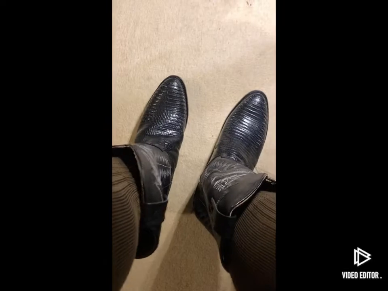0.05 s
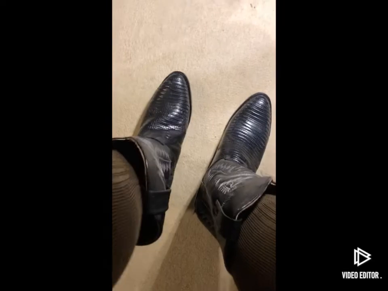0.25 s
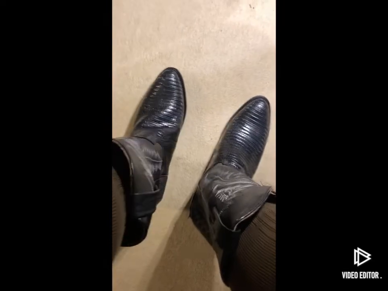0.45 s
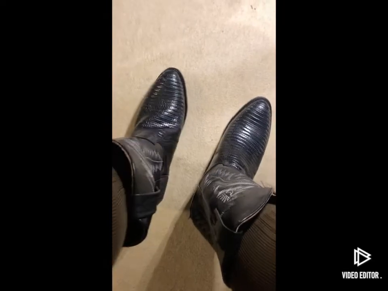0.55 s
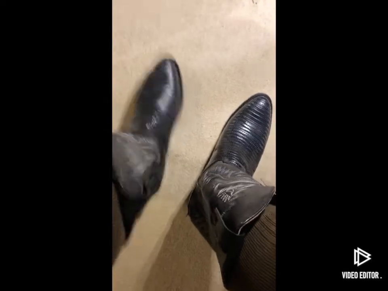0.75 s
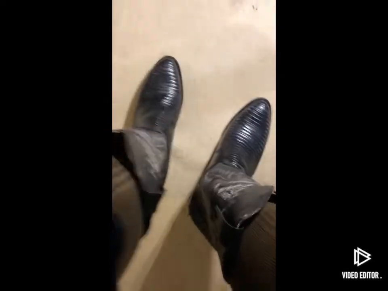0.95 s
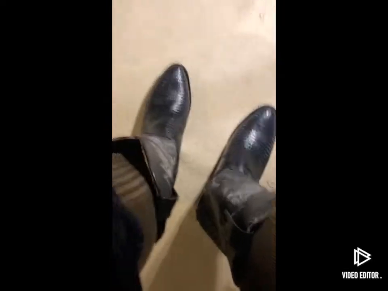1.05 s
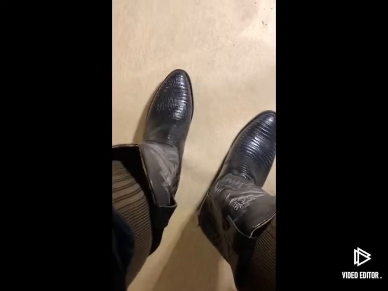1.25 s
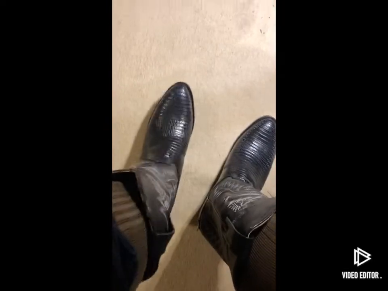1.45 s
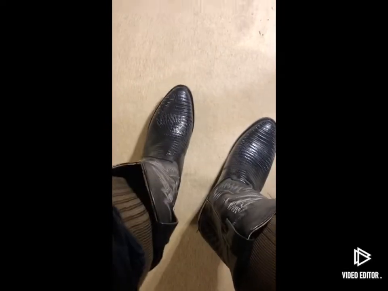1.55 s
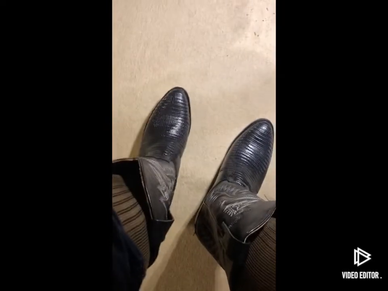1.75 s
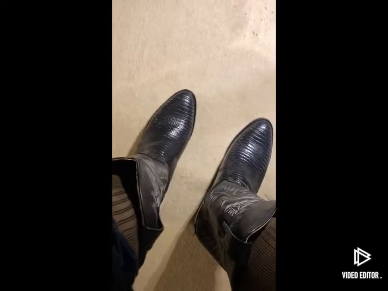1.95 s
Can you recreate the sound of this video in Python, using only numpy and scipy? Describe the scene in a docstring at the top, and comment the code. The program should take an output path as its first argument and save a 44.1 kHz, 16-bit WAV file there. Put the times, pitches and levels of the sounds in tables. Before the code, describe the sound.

Trouser cloth rubs over a leather boot as it creaks and scuffs on the floor.

```python
"""Trouser cloth rubs in strokes over a leather boot as it shifts on the floor of a small room.
Creases in the leather buckle with falling pops and dry crackles, and the hollow shaft rings with
the rubbing and the pops. The sole drags, slips and bumps along the floor; a mains hum runs underneath.
One microphone at knee height, with the short reflections of the room behind the boot."""
import sys
import numpy as np
from scipy import signal
from scipy.fft import rfft, irfft
from scipy.io import wavfile
from scipy.ndimage import uniform_filter1d

SR = 44100
rng = np.random.default_rng(int(sys.argv[2]) if len(sys.argv) > 2 else 0)


def transcribe(signal):
    """Save signal, clipped to [-1, 1], as a 16-bit WAV file at the path in sys.argv[1]."""
    frames = np.atleast_2d(signal).T
    limited = np.clip(frames, -1, 1)
    pcm = np.round(limited * 32767).astype(np.int16)
    wavfile.write(sys.argv[1], SR, pcm)


N = 88200

# hiss of cloth, also the crisp top of a slipping sole: frequency_hz, gain_db
HISS_SPECTRUM = [(3000, -13), (6000, 0), (8000, -2), (10500, -1), (13000, -4), (16000, -4.5)]


def undb(db):
    return 10 ** (np.asarray(db) / 20)


def unit_rms(x):
    return x / np.sqrt(np.mean(x ** 2))


def since(start_s):
    return np.maximum(np.arange(N) / SR - start_s, 0)


def colour(x, spectrum):
    """Filter by a curve through points of frequency_hz, gain_db."""
    hz, db = np.array(spectrum, float).T
    bin_hz = np.maximum(np.arange(N + 1) * SR / (2 * N), 1)
    gain = undb(np.interp(np.log(bin_hz), np.log(hz), db))
    return irfft(rfft(x, 2 * N) * gain)[:N]


def noise(spectrum):
    return unit_rms(colour(rng.standard_normal(N), spectrum))


def wander(per_s):
    """Smooth random drift with a spread near 1."""
    hold = max(int(SR / per_s), 2)
    steps = rng.standard_normal(N)[np.arange(N) // hold]
    return unit_rms(uniform_filter1d(steps, hold))


def friction(spectrum, grains_per_s=14000, spread_db=0.5, catches_per_s=110, catch_db=1.1):
    """Dense tiny releases of uneven size, in bunches as the surfaces catch."""
    hits = rng.random(N) < grains_per_s / SR
    grains = hits * rng.standard_normal(N) * undb(spread_db * np.minimum(rng.exponential(size=N), 4))
    bunching = undb(catch_db * wander(catches_per_s))
    return unit_rms(colour(grains * bunching, spectrum))


def room_tone(hum_hz=118.5, hum_db=-52.5, octave_db=-19.5, waver_db=0.5, air_db=-56):
    """A slightly wavering mains hum over still room air."""
    # room air: frequency_hz, gain_db
    air_spectrum = [(20, -38), (55, -0.5), (140, -4), (250, -5), (500, -15), (1000, -20), (2000, -22),
                    (4500, -23.5), (8000, -29), (16000, -30.5)]
    phase = 2 * np.pi * hum_hz * since(0)
    hum = unit_rms(np.sin(phase) + undb(octave_db) * np.sin(2 * phase))
    return undb(hum_db + waver_db * wander(per_s=9.1)) * hum + undb(air_db) * noise(air_spectrum)


def small_room(x, t60_s=0.43, gap_s=0.0045, reflections_db=-18.5):
    """The direct sound reaches the microphone, then short, dull reflections from floor and walls."""
    # reflections: frequency_hz, gain_db
    tail_spectrum = [(60, -35), (170, -18.5), (300, 3.5), (700, -2), (2000, 1.5), (8000, -13),
                     (16000, -33.5)]
    t = since(gap_s)
    tail = noise(tail_spectrum) * (t > 0) * np.exp(-np.log(1000) * t / t60_s)
    tail /= np.sqrt(np.sum(tail ** 2))
    return x + undb(reflections_db) * signal.fftconvolve(x, tail)[:N]


def sole_drag():
    """The sole judders over the floor, most of all while the foot swings forward."""
    # course of the drag: time_s, level_db
    drag_levels = [(0, -63), (.42, -59), (0.499, -46.5), (0.588, -41), (.64, -51.5), (.72, -48),
                   (.78, -44.5), (.83, -48), (.94, -60), (1.03, -58), (1.15, -63), (1.3, -56), (1.5, -67),
                   (2, -66)]
    # low rumble of the sole: frequency_hz, gain_db
    rumble_spectrum = [(25, -34), (60, -2.5), (120, -3.5), (190, -3.5), (300, -3.5), (400, -15.5),
                       (700, -26), (2000, -57)]
    time_s, level_db = np.array(drag_levels).T
    return undb(np.interp(since(0), time_s, level_db)) * friction(rumble_spectrum)


def sole_slips():
    """The sole lets go for a few milliseconds of coarse scraping with a crisp top."""
    # gritty slips: start_s, scrape_db, top_db, length_s
    slips = [(.003, -46.5, -62, 0.0071), (0.027, -42, -57, 0.0076), (0.513, -31.5, -47.5, 0.0048),
             (.574, -30, -47.5, .0045), (0.645, -42, -53, 0.0084), (1.256, -52, -58.5, 0.012),
             (1.739, -59, -51, 0.0014)]
    # scrape of the sole: frequency_hz, gain_db
    scrape_spectrum = [(30, -35), (150, -5), (400, 7), (800, 11), (1500, -6.5), (2700, 0), (6000, -8.5),
                       (9000, -24), (16000, -28)]
    out, scrape, top = np.zeros(N), friction(scrape_spectrum), friction(HISS_SPECTRUM)
    for start_s, scrape_db, top_db, length_s in slips:
        t = since(start_s)
        burst = (t > 0) * np.exp(-(t / length_s) ** 2 / 2)
        out += burst * (undb(scrape_db) * scrape + undb(top_db) * top)
    return out


def sole_bumps(attack_s=0.0021, thud_db=-13.5):
    """Soft blows of the sole: a damped low note and a thud of the floor."""
    # dull blows: start_s, level_db, pitch_hz, decay_s
    bumps = [(0.53, -44, 87, .012), (0.584, -35.5, 103, 0.016), (.75, -24, 125, 0.015),
             (0.7602, -21.5, 175, .016), (0.776, -25.5, 88.5, 0.02), (0.827, -28, 55.5, 0.016),
             (0.867, -26.5, 85.5, 0.014), (0.9135, -24, 128, 0.011), (.952, -44, 60, 0.057),
             (0.986, -34.5, 59, 0.01), (1.236, -45.5, 200, 0.025)]
    # thud of the floor: frequency_hz, gain_db
    thud_spectrum = [(20, -19), (45, 5), (110, 10), (200, -3.5), (340, -1.5), (600, -24), (1500, -31)]
    out, floor = np.zeros(N), noise(thud_spectrum)
    for start_s, level_db, pitch_hz, decay_s in bumps:
        t = since(start_s)
        ring = np.sin(2 * np.pi * pitch_hz * t) * np.exp(-t / decay_s)
        thud = undb(thud_db) * floor * np.exp(-t / (2 * decay_s))
        out += undb(level_db) * (1 - np.exp(-t / attack_s)) * (ring + thud)
    return out


def boot_ring(x):
    """The hollow boot rings when x shakes it."""
    # resonances of the boot: pitch_hz, width_hz, gain_db
    modes = [(338, 24, 4.5), (420, 17, -24.5), (616, 17, 3), (622, 18.4, -2.5), (978, 53, 2.5),
             (1235, 110, -14.5)]
    return sum(undb(gain_db) * signal.lfilter(*signal.iirpeak(pitch_hz, pitch_hz / width_hz, fs=SR), x)
               for pitch_hz, width_hz, gain_db in modes)


def leather_crackles():
    """Folds of leather grind against each other, each in one narrow band."""
    # dry crackles: start_s, level_db, centre_hz, length_s
    crackles = [(0.573, -33, 940, 0.0027), (0.797, -40, 1310, 0.0035), (.806, -41, 1250, 0.0035),
                (1.265, -52, 3550, 0.0046), (1.659, -57, 3000, .005), (1.738, -53, 3160, .004),
                (1.81, -51.5, 1930, 0.02)]
    out, grit = np.zeros(N), friction([(100, 0), (16000, 0)])  # flat spectrum
    for start_s, level_db, centre_hz, length_s in crackles:
        t = since(start_s)
        band = unit_rms(signal.lfilter(*signal.iirpeak(centre_hz, Q=2.8, fs=SR), grit))
        burst = (t > 0) * np.exp(-(t / length_s) ** 2 / 2)
        out += undb(level_db) * burst * band
    return out


def crease_pops(sweep_hz=1300, fall_s=0.002, attack_s=0.0009, hold_cycles=1.9, boot_db=-6.5):
    """A fold snaps with a tick; its rough ring drops quickly to a low note and shakes the boot."""
    # buckling creases: start_s, level_db, end_pitch_hz, decay_s
    pops = [(0.2074, -28.5, 342, 0.002), (0.2762, -30, 321, 0.0013), (0.442, -26, 324, 0.0028),
            (.4805, -28.5, 322, 0.003), (.549, -27, 311, 0.0054), (0.6692, -27.5, 310, 0.0027),
            (0.7556, -18.5, 335, 0.0013), (0.796, -33, 284, 0.01), (.971, -45.5, 530, 0.0028),
            (1.017, -45.5, 550, 0.0029), (1.1507, -40.5, 562, 0.0053), (1.221, -48, 576, 0.0028),
            (1.231, -45, 570, 0.0046), (1.239, -44.5, 600, 0.0029), (1.265, -43.5, 595, 0.0035),
            (1.309, -48, 654, 0.0013)]
    # tick of the snap: frequency_hz, gain_db
    tick_spectrum = [(600, 1.5), (1300, 2), (2700, -1.5), (5000, -4.5), (7000, -24), (15000, -25)]
    overtone_ratio, overtone_db = 1.73, -19
    tick_db, tick_s, rough_db = -9.5, 0.0023, 2.5
    out, snap = np.zeros(N), noise(tick_spectrum)
    roughness = unit_rms(undb(rough_db * wander(per_s=2400)))
    for start_s, level_db, end_pitch_hz, decay_s in pops:
        t = since(start_s)
        phase = 2 * np.pi * (end_pitch_hz * t + sweep_hz * fall_s * t / (t + fall_s))
        attack = 1 - np.exp(-t / attack_s)
        decay = np.exp(-np.maximum(t - hold_cycles / end_pitch_hz, 0) / decay_s)
        ring = roughness * (np.sin(phase) + undb(overtone_db) * np.sin(overtone_ratio * phase))
        tick = undb(tick_db) * (t > 0) * np.exp(-t / tick_s) * snap
        out += undb(level_db) * (attack * decay * ring + tick)
    return out + undb(boot_db) * boot_ring(out)


def cloth_rubbing(swell_exponent=1.47, boot_db=-1):
    """Each stroke swells and fades: rasp of leather, hiss of cloth and the hollow ring of the shaft."""
    # strokes of cloth over the boot: peak_s, rise_s, fall_s, rasp_db, hiss_db, body_db
    strokes = [(0.088, 0.072, 0.21, -53.5, -61.5, -49), (.215, 0.058, 0.12, -48.5, -54.5, -47),
               (0.356, 0.071, 0.065, -42, -48, -43), (0.421, 0.055, 0.023, -50.5, -56, -46),
               (.538, 0.024, 0.029, -47.5, -54.5, -46), (0.599, 0.027, 0.031, -44, -50, -47),
               (.7, 0.042, 0.033, -36.5, -43, -41), (.746, 0.036, 0.034, -32, -32.5, -35),
               (0.829, 0.12, 0.073, -58, -53.5, -49), (.91, 0.038, 0.021, -55.5, -72, -58),
               (1.03, 0.15, 0.088, -58.5, -69, -62.5), (1.262, .025, 0.031, -58.5, -64, -55.5),
               (1.33, 0.042, 0.057, -54, -60, -59), (1.384, 0.082, 0.055, -55, -57.5, -61.5),
               (1.49, 0.035, 0.04, -63.5, -61.5, -71), (1.555, 0.043, 0.049, -73, -58, -72),
               (1.825, 0.089, 0.07, -56, -61.5, -62), (1.922, 0.017, .025, -58, -61.5, -61)]
    # rasp of leather: frequency_hz, gain_db
    rasp_spectrum = [(100, -41), (600, 9), (1200, -4), (2000, -3.5), (3000, -1.5), (4300, -1.5),
                     (6000, -7.5), (8000, -16), (14000, -32.5)]
    # hollow body of the shaft: frequency_hz, gain_db
    body_spectrum = [(30, -25), (120, -7), (250, -5), (350, -5.5), (480, 0.5), (620, -2), (800, -9),
                     (1100, -9), (1600, -12), (3500, -38)]
    t, power = since(0), np.zeros((3, N))
    for peak_s, rise_s, fall_s, *levels_db in strokes:
        width_s = np.where(t < peak_s, rise_s, fall_s)
        swell = np.exp(-(np.abs(t - peak_s) / width_s) ** swell_exponent)
        power += (undb(levels_db)[:, None] * swell) ** 2
    shaft_rub = friction(body_spectrum)
    body = unit_rms(shaft_rub + undb(boot_db) * boot_ring(shaft_rub))
    rasp, hiss = friction(rasp_spectrum), friction(HISS_SPECTRUM)
    return np.sum(np.sqrt(power) * [rasp, hiss, body], axis=0)


def scene():
    """The boot in the small room, over the room tone, in mono."""
    boot = cloth_rubbing() + sole_drag() + crease_pops() + leather_crackles()
    boot += sole_slips() + sole_bumps()
    return (small_room(boot) + room_tone())[None]


def record(dry):
    """The microphone chain cuts the highest treble steeply."""
    cutoff_hz = 15900
    return signal.sosfilt(signal.ellip(10, 0.2, 75, cutoff_hz, fs=SR, output="sos"), dry)


dry = scene()
out = record(dry)
transcribe(out)
```